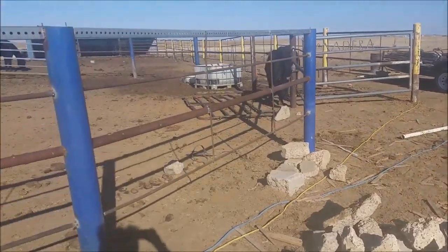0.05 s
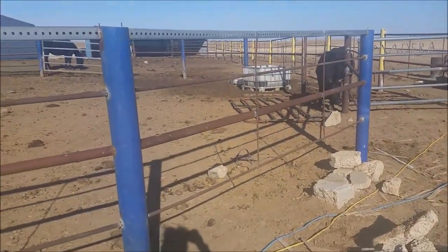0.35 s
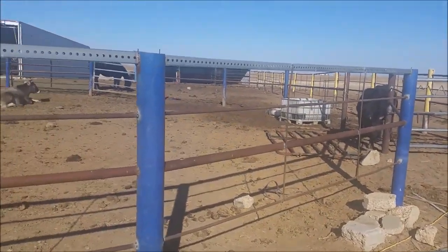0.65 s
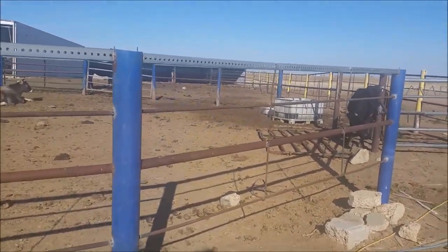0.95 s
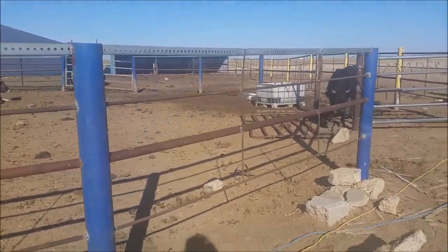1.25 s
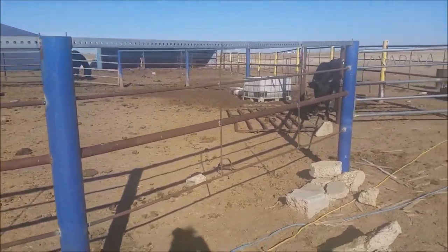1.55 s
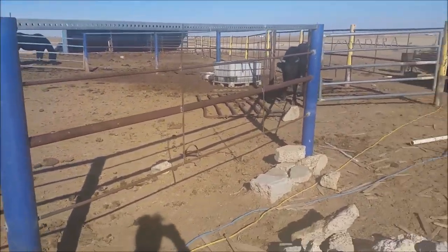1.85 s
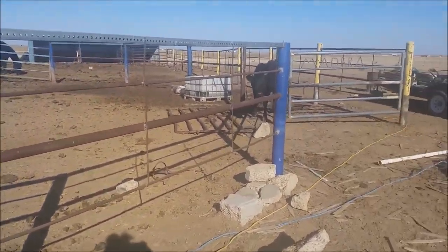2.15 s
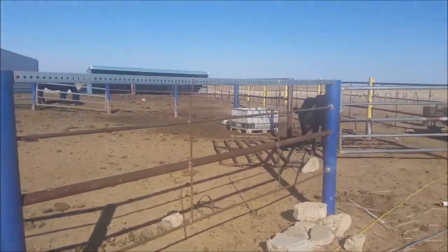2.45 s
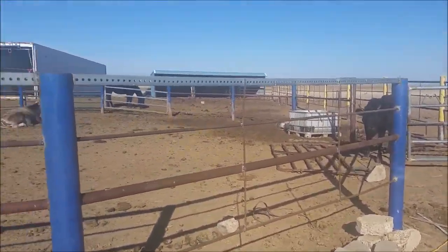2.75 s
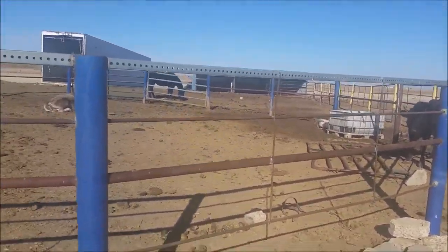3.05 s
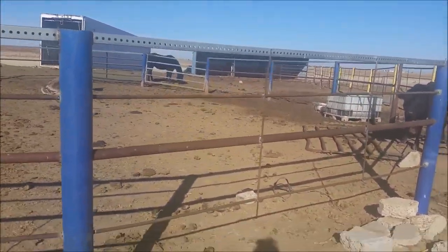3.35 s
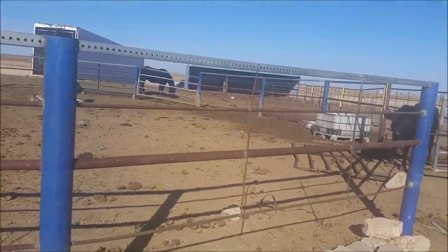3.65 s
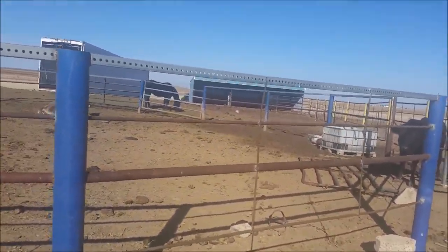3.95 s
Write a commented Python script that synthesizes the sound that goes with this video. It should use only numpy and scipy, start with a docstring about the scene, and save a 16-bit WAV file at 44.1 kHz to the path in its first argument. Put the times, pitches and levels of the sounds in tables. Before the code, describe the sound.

Gusty wind thumps on the microphone while a chain clanks on steel fencing.

```python
"""Wind gusts buffet the two ports of a hand-held microphone, first mostly the left, then the right:
each eddy is a pressure spike, and crowds of them thump and rumble. Some metres off in the cattle pen,
a loose chain and latch clank, ring and scrape on steel pipe fencing. A turbulent hiss, like a valve
letting water through, swells and dies away over the faint air of a distant farm."""
import sys
import numpy as np
from scipy import signal
from scipy.fft import rfft, irfft
from scipy.io import wavfile
from scipy.ndimage import uniform_filter1d, minimum_filter1d

SR = 44100
rng = np.random.default_rng(int(sys.argv[2]) if len(sys.argv) > 2 else 0)


def log_audio(samples):
    """Write samples as a 16-bit WAV file to the path given in sys.argv[1]."""
    # one column per channel
    frames = np.atleast_2d(samples).T
    # limit to full scale, then quantise
    limited = np.clip(frames, -1, 1)
    pcm = np.round(limited * 32767).astype(np.int16)
    wavfile.write(sys.argv[1], SR, pcm)


N = 4 * SR

# Gusts: port (L or R), t/s, length/s, level/dB before the wind trim, sharpest eddy/ms (narrow = harsh)
GUSTS = [("L", .0, .012, -15, .5), ("L", .036, .01, -16, .42), ("L", .212, .033, -13.5, 1.05),
         ("L", .378, .02, -12, .62), ("L", .414, .012, -15, .55), ("L", .548, .088, -11, .38),
         ("L", .66, .026, -17, .6), ("L", .77, .1, -19, .7), ("L", 1.068, .08, -13.5, .52),
         ("L", 1.17, .095, -14, .5), ("L", 1.315, .12, -14, .72), ("L", 1.495, .22, -17.5, .7),
         ("L", 1.89, .16, -16, .62), ("L", 2.06, .03, -12, .95), ("L", 2.18, .095, -15, .55),
         ("L", 2.656, .008, -13.5, .36), ("L", 2.794, .012, -11, .36), ("L", 2.825, .075, -12, .33),
         ("L", 2.911, .06, -13, .45), ("L", 3.6, .035, -16, .6), ("R", 1.15, .03, -19, .6),
         ("R", 1.22, .15, -21, .65), ("R", 1.448, .02, -18, .3), ("R", 3.045, .07, -14.5, .47),
         ("R", 3.12, .08, -14.5, 1.3), ("R", 3.43, .04, -15, .7), ("R", 3.498, .012, -15, .45),
         ("R", 3.54, .022, -14, .65), ("R", 3.738, .016, -15, .42), ("R", 3.775, .012, -16, .5),
         ("R", 3.853, .011, -13.5, .38), ("R", 3.958, .035, -14, .33)]
# Soft rumble bed at each port: t/s, level/dB before the wind trim
RUMBLE_LEFT = [(0, -20), (.11, -40), (.15, -19), (.32, -42), (.46, -27), (.85, -26), (.96, -38),
               (1.1, -23.5), (1.7, -26), (1.79, -34), (1.86, -20.5), (2.45, -28), (2.61, -41.5),
               (2.68, -24), (4, -24)]
RUMBLE_RIGHT = [(0, -36), (1.1, -43), (1.55, -28), (1.68, -47), (2.6, -43), (2.7, -28), (2.86, -42),
                (3, -19.5), (4, -18.5)]
# Steel hits: t/s, level/dB, tilt/(dB/octave), rise/s, fall to -60 dB/s, struck f/Hz, relative ring/dB
CLANKS = [(.0, -57, -4, .004, .83, 2700, 0), (.31, -57, -6, .008, .3, 2385, -6),
          (1.285, -51, 1, .005, .45, 5313, 7), (1.922, -27, 3.5, .003, 0.15, 7520, -6),
          (2.243, -21.5, 0.5, .004, .13, 4436, -4), (2.299, -24.5, 3, .002, .22, 7520, -5),
          (2.328, -21, -1.5, .01, .23, 2822, -13), (2.525, -27.5, -3, .018, .25, 3300, -15),
          (2.728, -41.5, -5, .008, .2, 3300, -15), (2.911, -35, -3.5, .006, 0.26, 4436, -9.5),
          (3.121, -30.5, -5, .005, 0.26, 2385, -11), (3.291, -26.5, -0.5, .005, .16, 6412, 0),
          (3.367, -37, -2, .003, 0.15, 6412, -2.5), (3.449, -39, 0.5, .004, 0.15, 5852, -10),
          (3.567, -39, -5, .006, .12, 3300, -14), (3.65, -25, 3, .002, .06, 5852, 2),
          (3.688, -32, 3, .003, 0.03, 5852, -4), (3.81, -45.5, -4, .005, 0.2, 2385, -9.5)]
# Clear ringing modes of the steel: f/Hz, relative level/dB, t60/s
STEEL_MODES = [(2056, -13, .4), (2385, -9, .3), (2700, -13, .4), (2822, -7, .24), (4436, -9, .2),
               (4810, -8, .18), (5313, -5, .2), (5852, 0, .16), (6412, -7, .15), (7203, -9, .18),
               (7520, -4, .2)]
# Colour of its crowd of short-lived modes: f/Hz, relative level/dB
STEEL_SPECTRUM = [(300, -30), (700, -12), (1500, -4.5), (3000, -1), (3900, -8.5), (4800, -6.5), (5700, -6),
                  (7400, -6.5), (8200, -13), (12000, -15), (15500, -27)]
# Fader for the steel dragging between hits: t/s, level/dB
SCRAPE_LEVEL = [(2.1, -71), (2.35, -45), (2.75, -51), (3.1, -56), (3.22, -48), (3.42, -43), (3.66, -46),
                (3.78, -55), (4, -61)]
# Swell of the hiss: t/s, level/dB, tilt/(dB/octave)
HISS_SWELL = [(0, -68, 1), (.45, -78.5, -0.5), (1.05, -76, -0.5), (1.08, -58, -5.5), (1.19, -51.5, -3.5),
              (1.25, -56, -2.5), (1.3, -49.5, -.5), (2.1, -45.5, 0), (2.42, -42, -1), (2.6, -48.5, -1.5),
              (2.83, -63, -5), (4, -68, -3)]
# Resonances of the hiss: f/Hz, relative level/dB
HISS_SPECTRUM = [(880, -48), (1500, -18), (1920, -8), (2110, -12.5), (2330, -2), (2600, 1), (3500, -11.5),
                 (4060, -11.5), (4390, -20), (4720, -7), (6500, -12), (7400, -10), (8200, -19.5),
                 (9300, -20), (10100, -12), (11000, -17), (15500, -17.5)]
# Colour of the distant farm: f/Hz, relative level/dB
AIR_SPECTRUM = [(500, -7), (2600, -24), (4500, -31.5), (15500, -35)]

WIND_TRIM_DB, EDDIES_PER_S, EDDY_SCATTER_DB = 2.2, 160, 3
PORT_HZ, PORT_DAMPING, PORT_LEAK_HZ, PORT_LAG_S = 104, 1.15, 70, .00043
PIVOT_HZ = 4500  # every tilt turns about this frequency
STEEL_PAN_DB, STEEL_DIFFUSE, RIPPLE_DB, RIPPLE_HZ = -3, .4, 4.8, 70
CONTACT_DB, CONTACT_OCTAVES, CHATTER_DB, CHATTER_PER_S = 4, .2, 3, 260
RING_BOOST_DB, RING_WIDTH_HZ, RING_SCATTER_DB = 10, 70, 4
YARD_DB, YARD_T60_S, YARD_DB_PER_OCT = -16.5, .6, -3.5
HISS_PAN_DB, HISS_PAN_DB_PER_OCT = -4.5, -2.5


def wind():
    """Each port gets its own soft rumble of wide eddies and its own gusts of sharper ones."""
    out = np.zeros((2, N))
    for port, fader in zip(out, (RUMBLE_LEFT, RUMBLE_RIGHT)):
        rumble, lead = eddies(N / SR, width_ms=1.35, widening=0, max_count=1600)
        add(port, rumble, -lead)
        port *= undb(curve(fader))
    for side, start, length, db, width_ms in GUSTS:
        gust, lead = eddies(length, width_ms, widening=.4, max_count=80)
        add(out["LR".index(side)], gust * undb(db), start - lead)
    return out * undb(WIND_TRIM_DB)


def eddies(length, width_ms, widening, max_count):
    """Pressure spikes cross a port, which sheds the lowest bass. Returns the sound and its lead-in/s."""
    pad = 2048
    pressure = np.zeros(int(length * SR) + 2 * pad)
    near, taper = np.arange(-pad // 2, pad // 2), np.hanning(pad)
    count = int(np.clip(round(length * EDDIES_PER_S), 2, max_count))
    draws = rng.random((max_count, 3))
    strength = undb(EDDY_SCATTER_DB * np.clip(rng.standard_normal(max_count), -1.5, 2))
    for k, (jitter, polarity, breadth) in enumerate(draws[:count]):
        along = np.clip((k + 2 * jitter - .5) / count, 0, 1)
        width = width_ms * SR / 1000 * np.exp(.72 * breadth)
        width *= 1 + widening * (2 * along - 1) ** 2  # slower, so wider, as a gust comes and goes
        spike = np.sign(polarity - .5) * strength[k] * taper / (1 + (near / width) ** 2)
        pressure[pad + int(along * length * SR) + near] += spike
    omega = 2 * np.pi * PORT_HZ
    port = signal.bilinear([1, 2 * np.pi * PORT_LEAK_HZ, 0], [1, PORT_DAMPING * omega, omega ** 2], SR)
    buffet = signal.lfilter(*port, pressure)
    return buffet / np.sqrt(np.sum(buffet ** 2) / (length * SR)), pad / SR


def steel():
    """Chain and latch drag, knock and squeak on the fence, a little right of centre."""
    out = scrape()
    for start, db, *hit in CLANKS:
        add(out, undb(db) * clank(*hit), start)
    return (out + squeak()) * pan(STEEL_PAN_DB)


def clank(tilt, rise, fall, ring_hz, ring_db):
    """Chattering contacts excite a crowd of short modes and a few clear ones; the yard answers, duller."""
    size = 20480
    t, hz = np.arange(size) / SR, freqs(size)
    # each point of contact favours the modes around its struck frequency
    contact = CONTACT_DB * np.exp(-(np.log2(hz / ring_hz) / CONTACT_OCTAVES) ** 2)
    colour = steel_colour(hz, tilt) + contact
    attack = np.minimum(t / rise, 1)
    decay = np.log(1000) * np.maximum(t - rise, 0)  # exp(-decay / t60) falls 60 dB in t60
    crowd = stereo_noise(colour, STEEL_DIFFUSE, PORT_LAG_S) * np.exp(-decay / fall)
    crowd *= undb(CHATTER_DB * walk(t * CHATTER_PER_S))
    yard = stereo_noise(colour + tilt_db(hz, YARD_DB_PER_OCT), diffuse=1) * np.exp(-decay / YARD_T60_S)
    return attack * (crowd + undb(YARD_DB) * yard + undb(ring_db) * ring(t, decay, tilt, ring_hz))


def ring(t, decay, tilt, ring_hz):
    """The clear modes ring out; one near ring_hz is struck best and sings louder and longer."""
    mode_hz, mode_db, mode_t60 = np.array(STEEL_MODES).T
    struck = np.exp(-((mode_hz - ring_hz) / RING_WIDTH_HZ) ** 2)
    scatter = RING_SCATTER_DB * rng.standard_normal(len(mode_hz))
    gains = undb(mode_db + tilt * np.log2(mode_hz / PIVOT_HZ) + scatter + RING_BOOST_DB * struck)
    arrival = np.array([t, t - PORT_LAG_S])
    out = 0
    for gain, hz, t60 in zip(gains, mode_hz, mode_t60 * (1 + .5 * struck)):
        phase = 2 * np.pi * (hz * arrival + rng.random())
        phase += rng.standard_normal((2, 1))  # reflections shift the phase at each port
        out += gain * np.sin(phase) * np.exp(-decay / t60)
    return out / np.sqrt(np.sum(gains ** 2) / 2)


def steel_colour(hz, tilt):
    """The steel's crowded modes as a tilted spectrum in dB, with random peaks and dips."""
    return shape(STEEL_SPECTRUM, hz) + tilt_db(hz, tilt) + RIPPLE_DB * walk(hz / RIPPLE_HZ)


def scrape(grain_db=2, grains_per_s=90):
    """Dragging metal gives a dark, grainy scrape between the clanks."""
    friction = stereo_noise(steel_colour(freqs(N), tilt=-5.5), STEEL_DIFFUSE, PORT_LAG_S)
    grain = grain_db * walk(np.arange(N) / SR * grains_per_s)
    return friction * undb(curve(SCRAPE_LEVEL) + grain)


def squeak(start_s=1.91, length_s=.23, pitch_hz=11650, db=-47):
    """Rubbing steel gives one thin, wavering squeak."""
    t = np.arange(N) / SR
    swell = np.sin(np.pi * np.clip((t - start_s) / length_s, 0, 1)) ** 2
    return undb(db) * swell * np.sin(2 * np.pi * pitch_hz * t + walk(t * 60))


def hiss():
    """Turbulent flow through steady resonances brightens as it opens; its treble sits to the right."""
    hz = freqs(N)
    flow = rfft(stereo_noise(shape(HISS_SPECTRUM, hz), diffuse=.4))
    level, tilt = curve(HISS_SWELL), curve(HISS_SWELL, column=2)
    octaves = np.arange(-2, 2.5, .5)
    out = np.zeros((2, N))
    for octave, weights in zip(octaves, np.eye(len(octaves))):
        band = irfft(flow * np.interp(np.log2(hz / PIVOT_HZ), octaves, weights))
        out += band * undb(level + tilt * octave) * pan(HISS_PAN_DB + HISS_PAN_DB_PER_OCT * octave)
    return out


def farm_air(db=-58):
    """The distant farm is a faint, wide, dull bed of noise."""
    return undb(db) * stereo_noise(shape(AIR_SPECTRUM, freqs(N)), diffuse=.8)


def stereo_noise(colour_db, diffuse, lag_s=0):
    """Coloured noise at rms 1: a shared part, lag_s late on the right, and a diffuse share of the power."""
    size = 2 * (len(colour_db) - 1)
    shared, left, right = rfft(rng.standard_normal((3, size)))
    direct = np.array([shared, shared * np.exp(-2j * np.pi * freqs(size) * lag_s)])
    blend = np.sqrt(1 - diffuse) * direct + np.sqrt(diffuse) * np.array([left, right])
    noise = irfft(blend * undb(colour_db))
    return noise / np.sqrt(np.mean(noise ** 2) + 1e-20)


def undb(db):
    """Decibels to gain."""
    return 10 ** (np.asarray(db) / 20)


def curve(rows, column=1):
    """An automation lane: one table column, joined by straight lines in time."""
    rows = np.array(rows)
    return np.interp(np.arange(N) / SR, rows[:, 0], rows[:, column])


def freqs(size):
    """Bin frequencies for this many samples, floored at 1 Hz."""
    return np.maximum(np.fft.rfftfreq(size, 1 / SR), 1)


def shape(points, hz):
    """An EQ curve in dB, joined on a log-frequency axis."""
    points = np.array(points)
    return np.interp(np.log(hz), np.log(points[:, 0]), points[:, 1])


def tilt_db(hz, db_per_octave):
    """A tilt EQ that levels off below a third of the pivot."""
    return db_per_octave * np.log2(np.maximum(hz, PIVOT_HZ / 3) / PIVOT_HZ)


def walk(position):
    """Smooth random values, a new one at each whole position."""
    size = 4096
    return np.interp(position % size, np.arange(size), rng.standard_normal(size))


def pan(db):
    """Left and right gains for a level difference; negative leans right."""
    return undb(np.array([[db], [-db]]) / 2)


def add(out, sound, start_s):
    """Mix a sound in from this time on."""
    i = int(start_s * SR)
    sound, i = sound[..., max(-i, 0):], max(i, 0)
    out[..., i:i + sound.shape[-1]] += sound[..., :max(N - i, 0)]


def scene():
    """Wind up front, then steel and hiss, over the faint open air."""
    return wind() + steel() + hiss() + farm_air()


def record(dry, ceiling=.9, limiter_s=.008, top_hz=15800):
    """A limiter ducks the strongest buffets; a steep low-pass cuts the top."""
    span = int(limiter_s * SR)
    peak = np.abs(dry).max(axis=0)
    gain = minimum_filter1d(ceiling / np.maximum(peak, ceiling), 2 * span)
    limited = dry * uniform_filter1d(uniform_filter1d(gain, span), span)
    return signal.sosfilt(signal.ellip(10, .2, 80, top_hz, fs=SR, output="sos"), limited)


dry = scene()
out = record(dry)
log_audio(out)
```